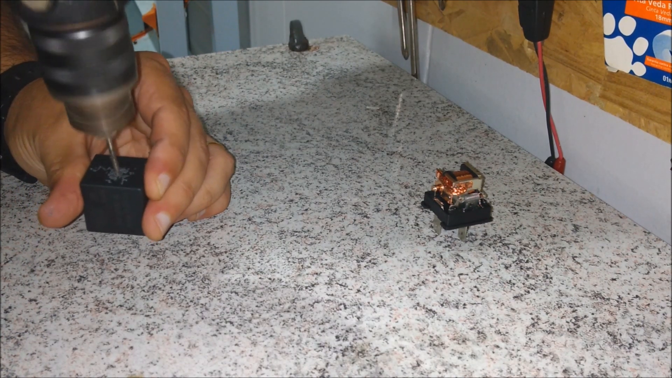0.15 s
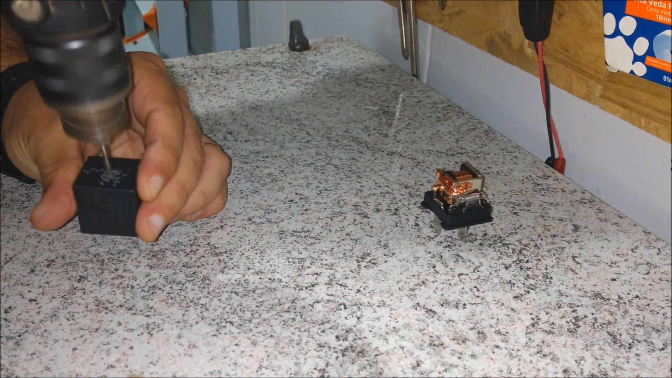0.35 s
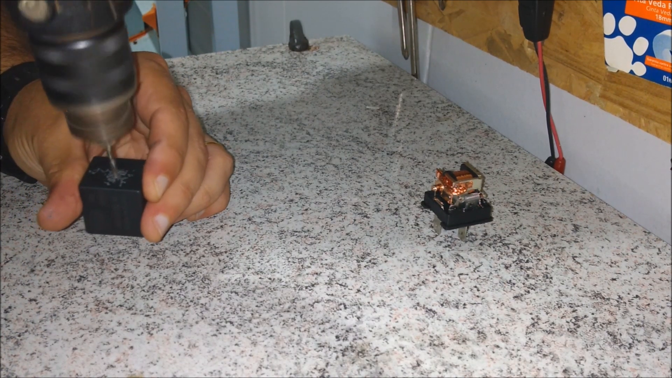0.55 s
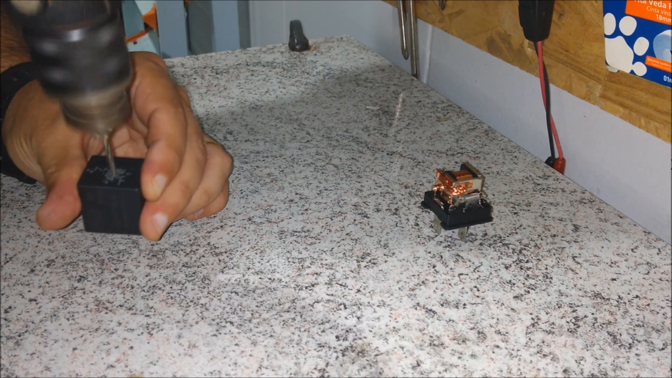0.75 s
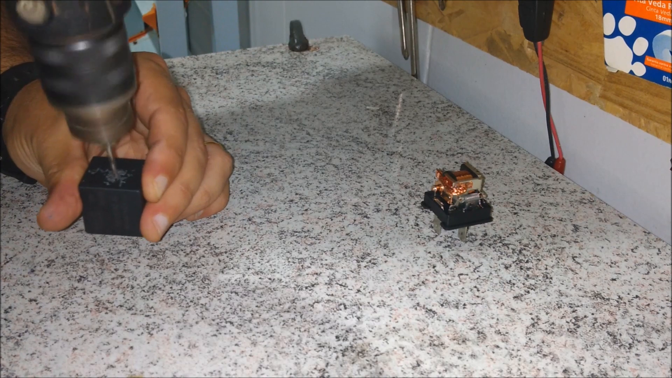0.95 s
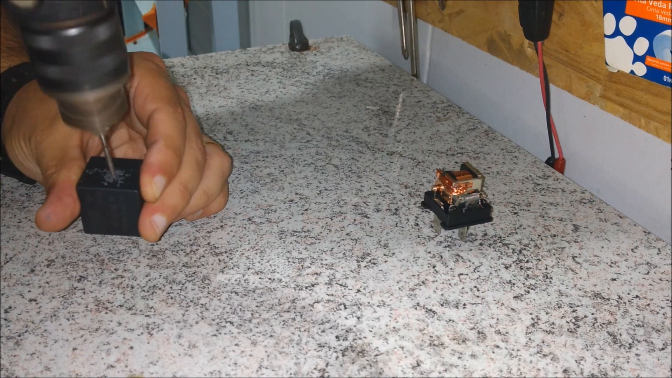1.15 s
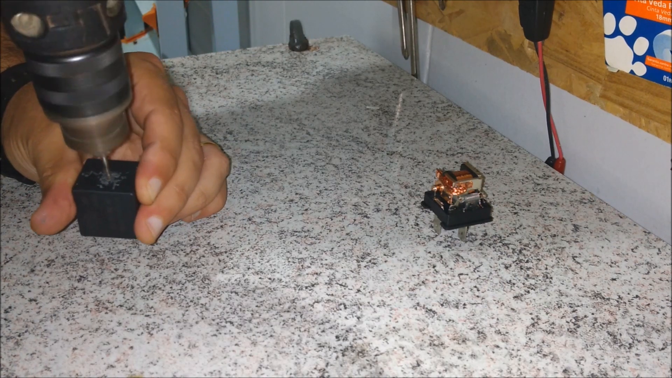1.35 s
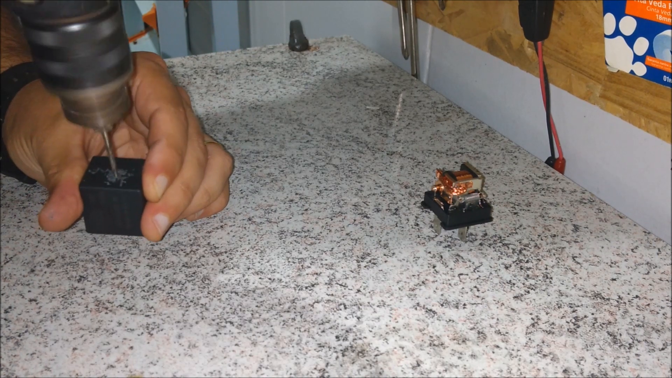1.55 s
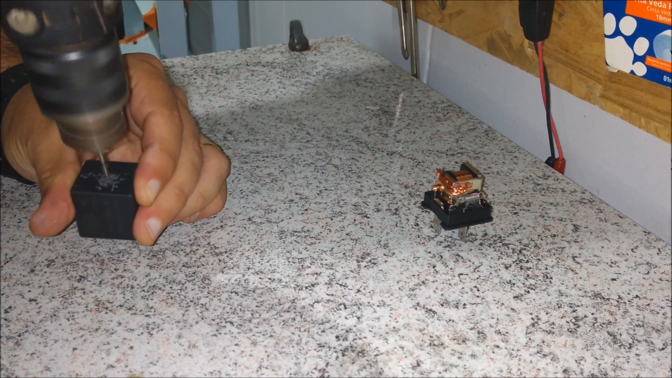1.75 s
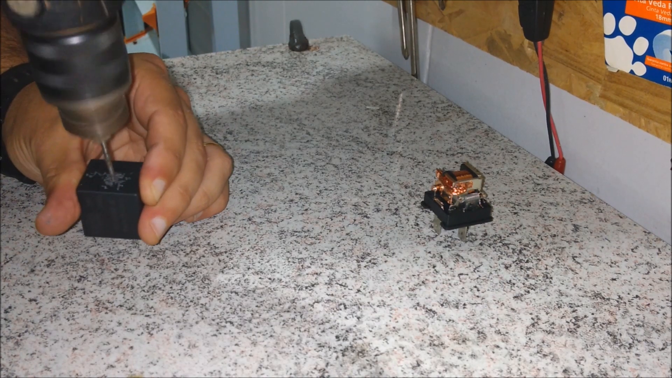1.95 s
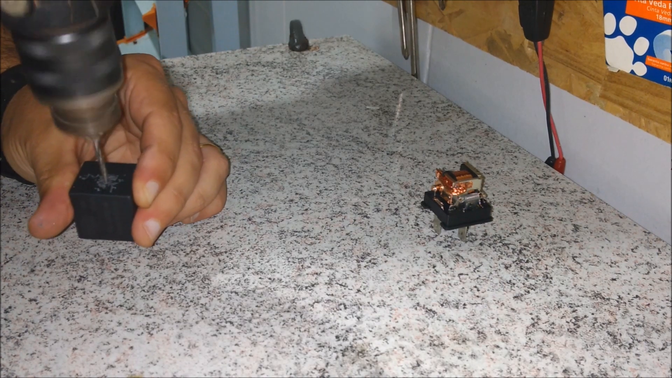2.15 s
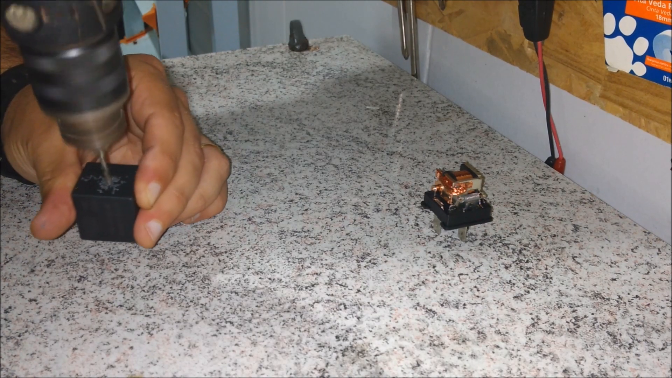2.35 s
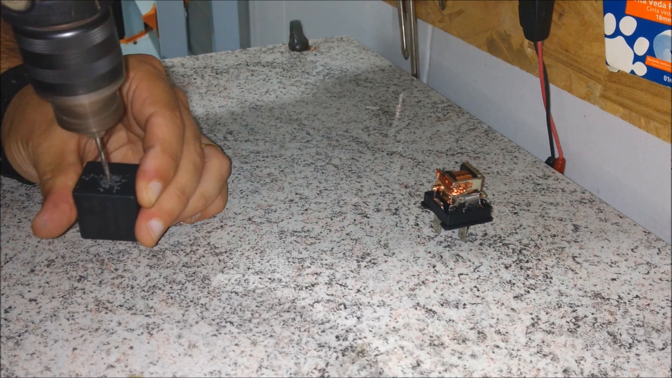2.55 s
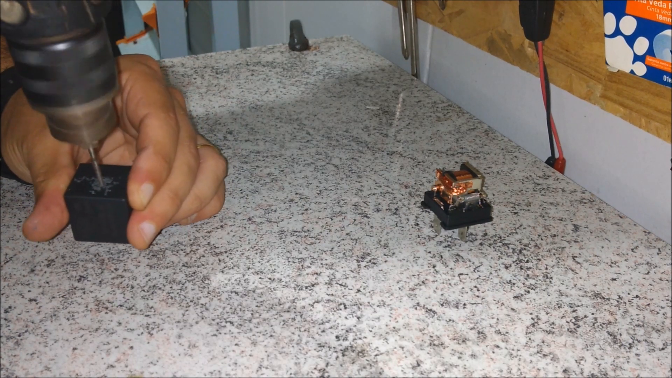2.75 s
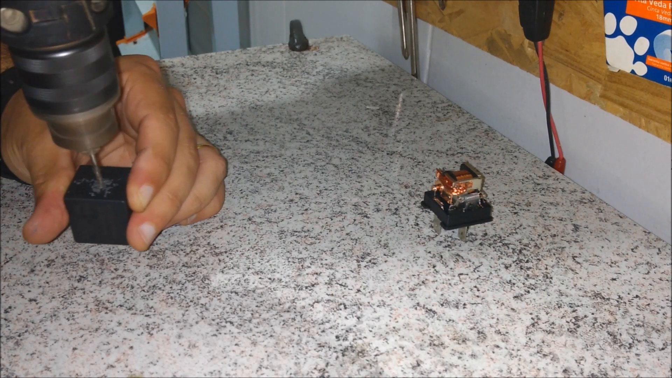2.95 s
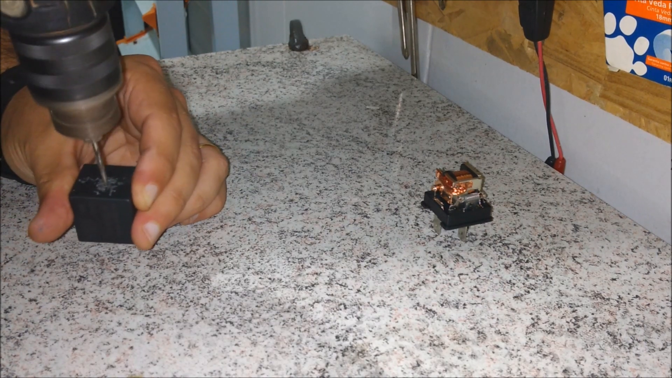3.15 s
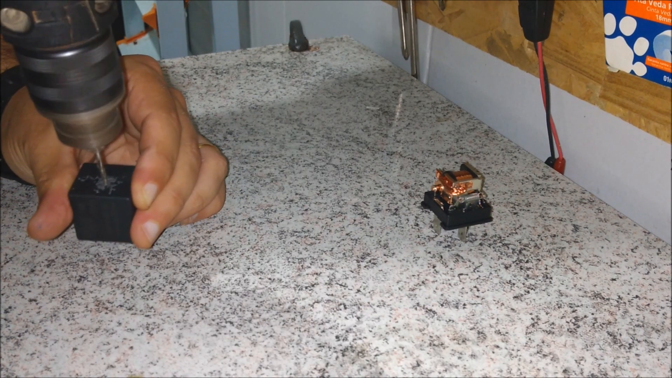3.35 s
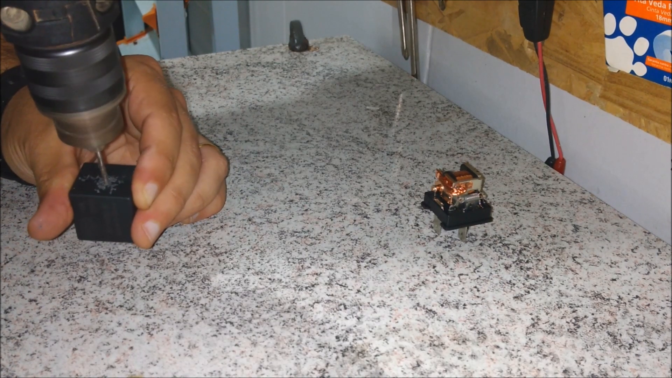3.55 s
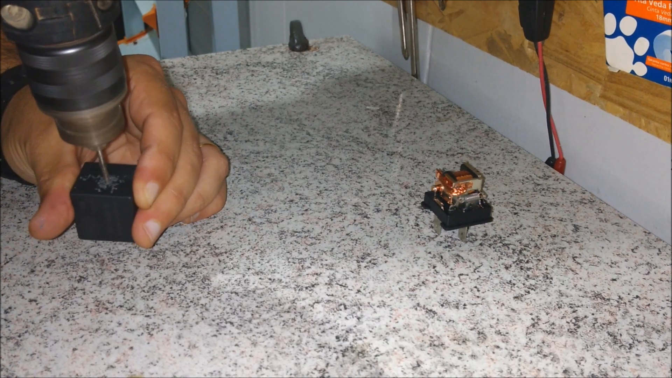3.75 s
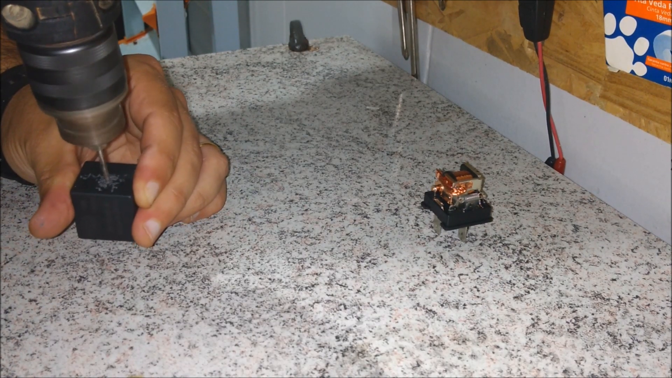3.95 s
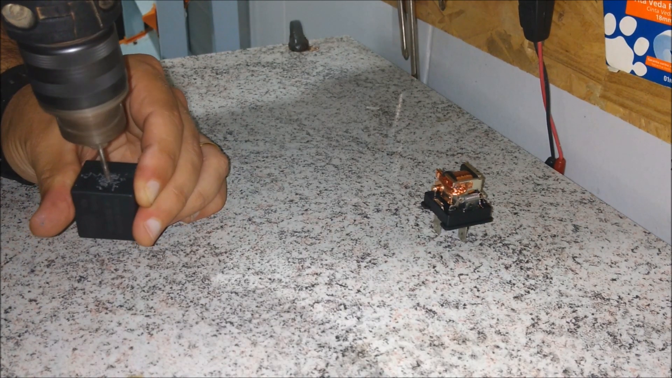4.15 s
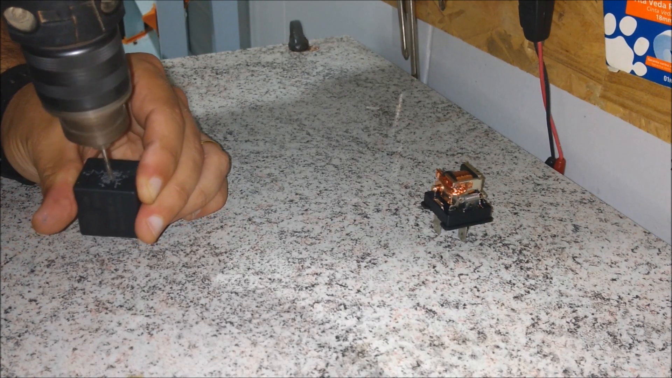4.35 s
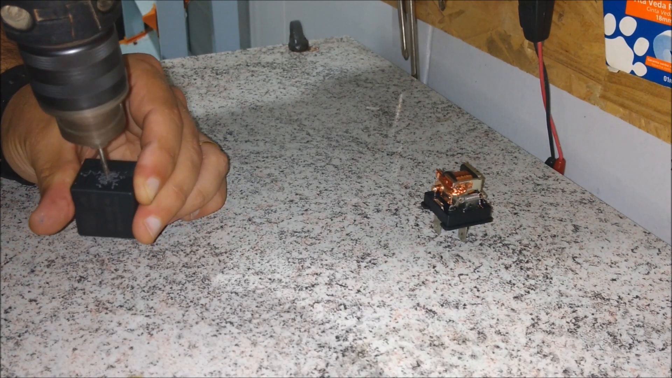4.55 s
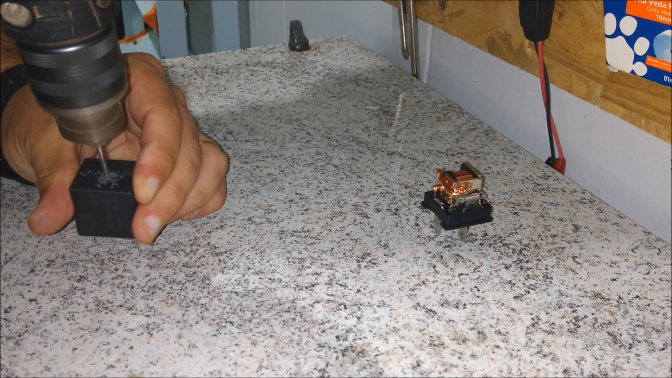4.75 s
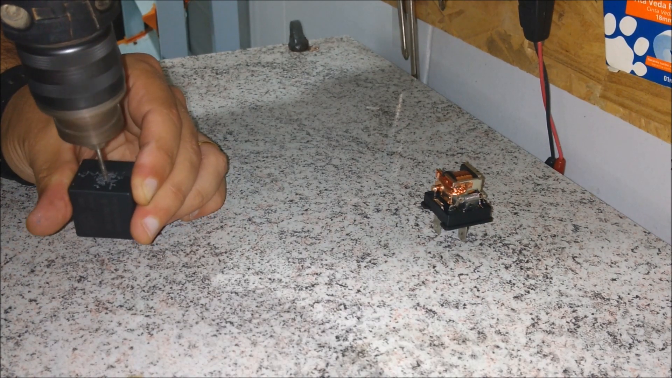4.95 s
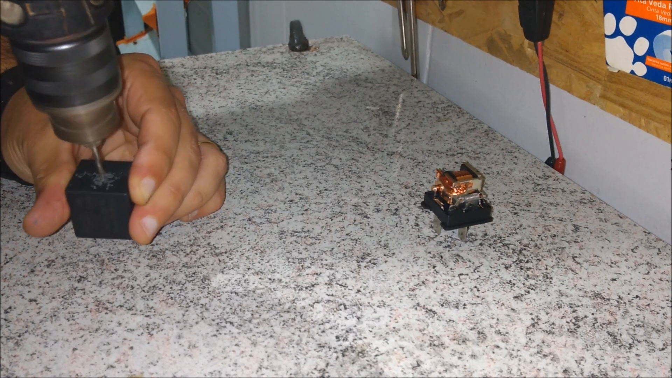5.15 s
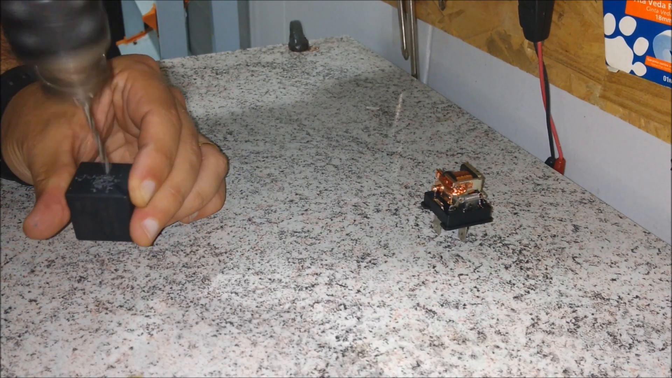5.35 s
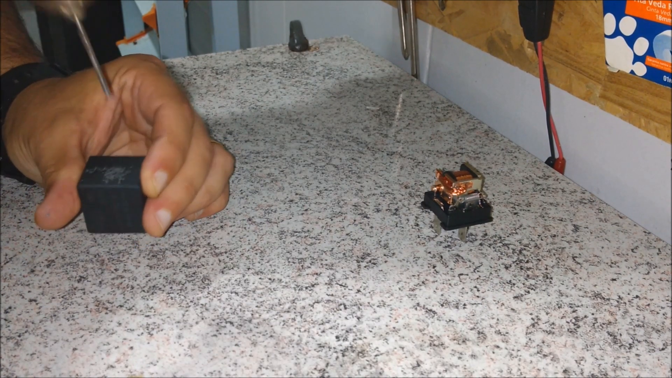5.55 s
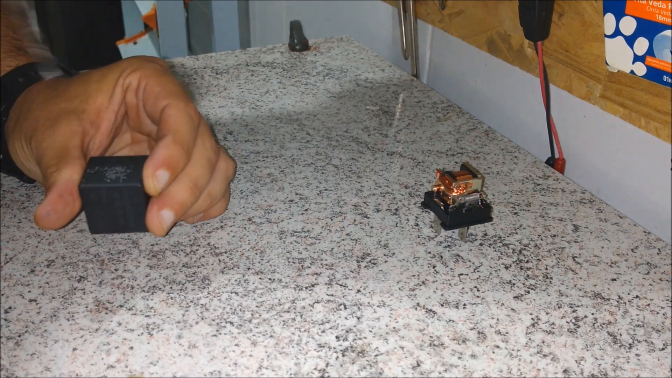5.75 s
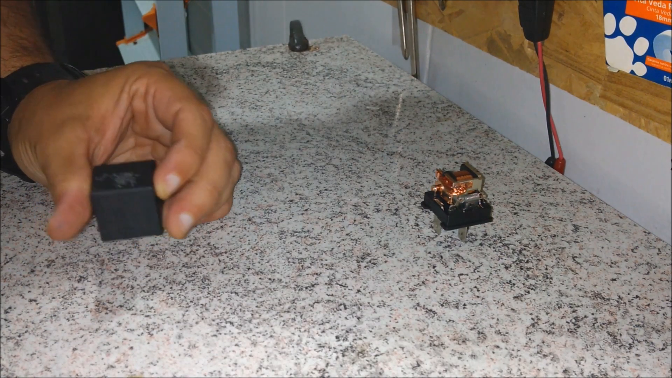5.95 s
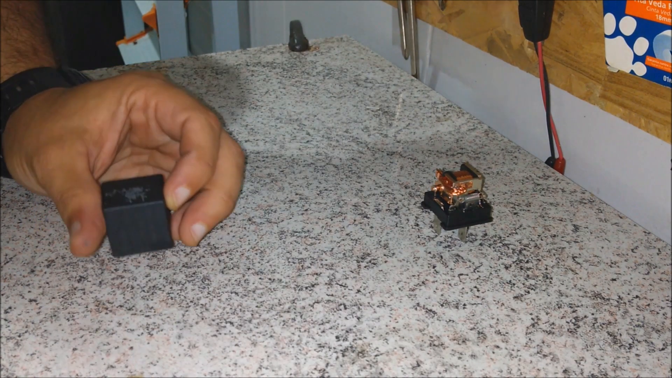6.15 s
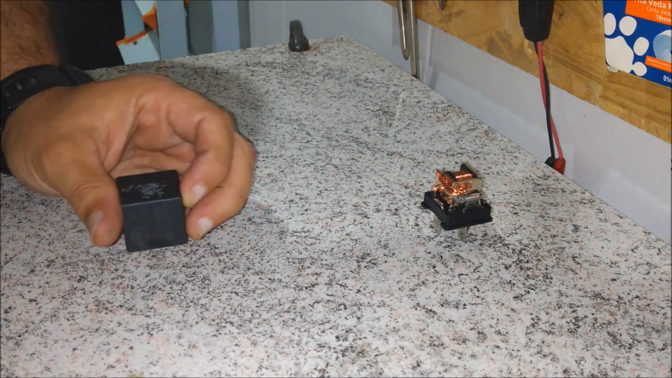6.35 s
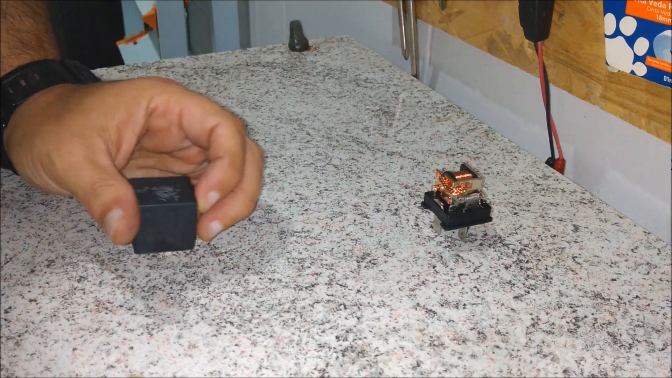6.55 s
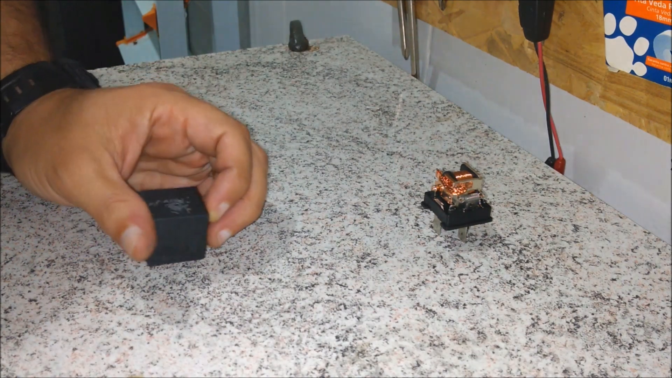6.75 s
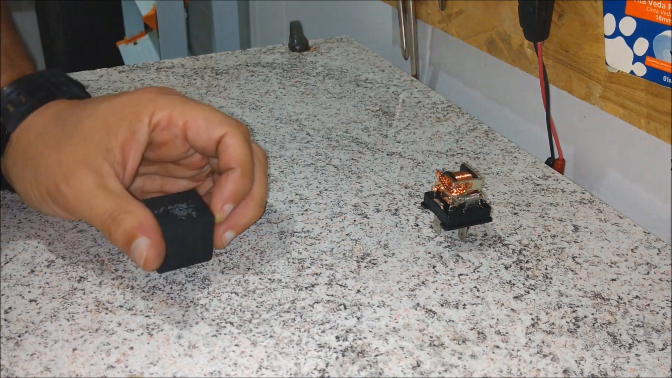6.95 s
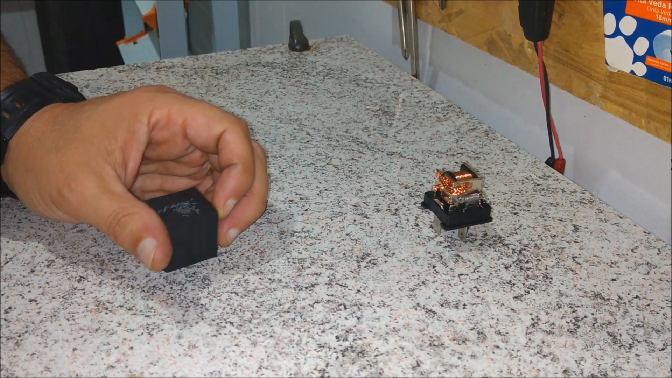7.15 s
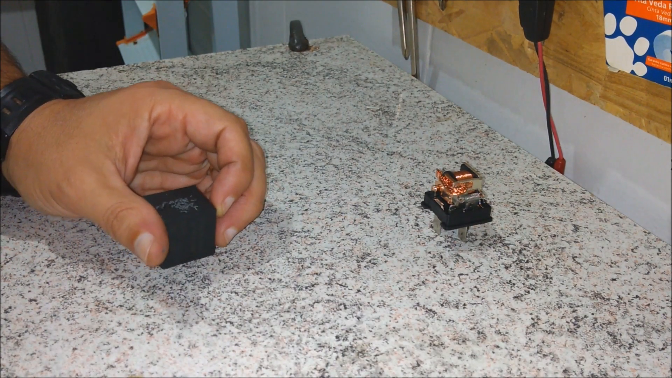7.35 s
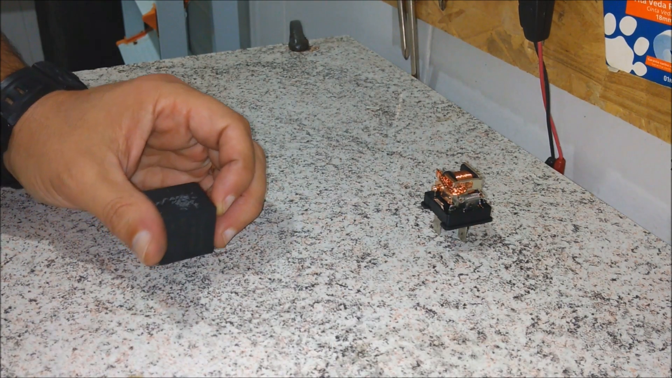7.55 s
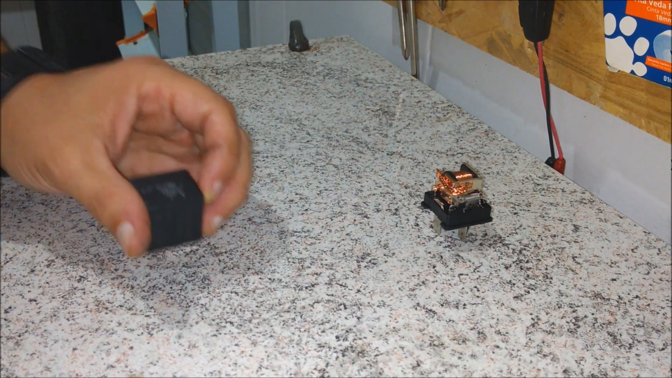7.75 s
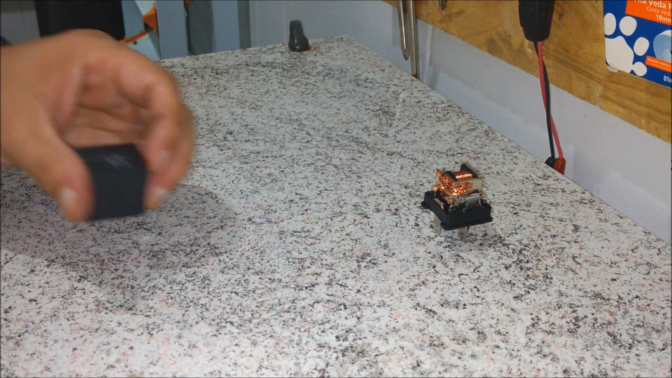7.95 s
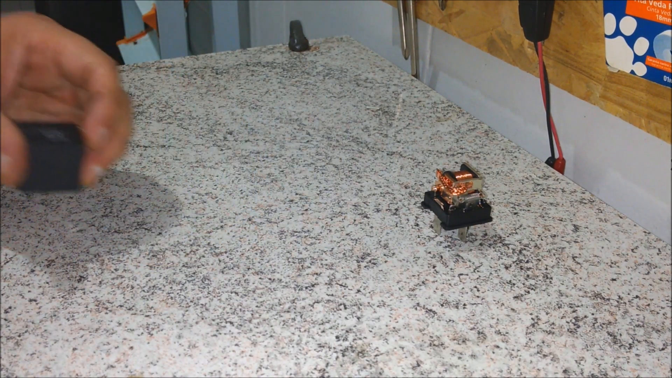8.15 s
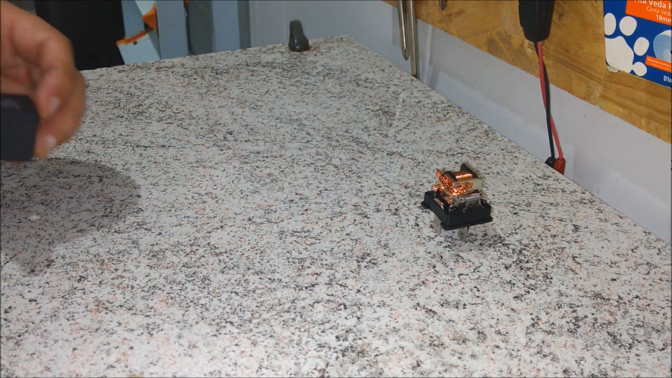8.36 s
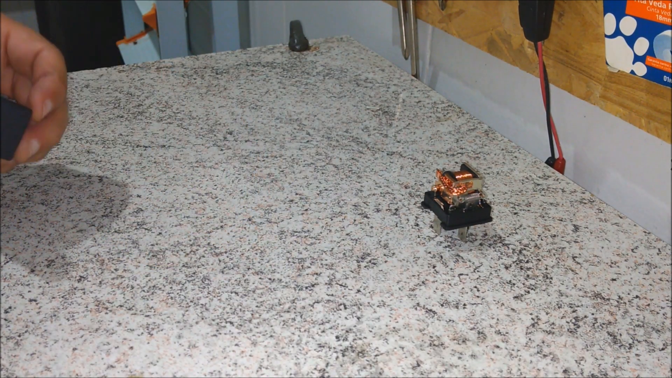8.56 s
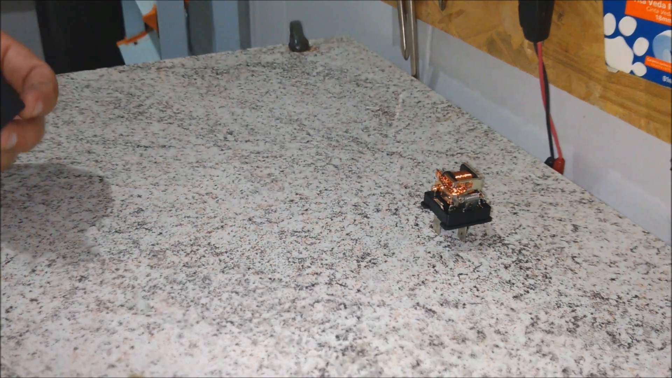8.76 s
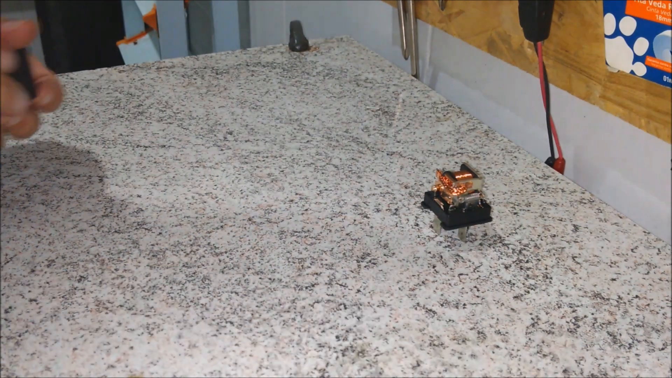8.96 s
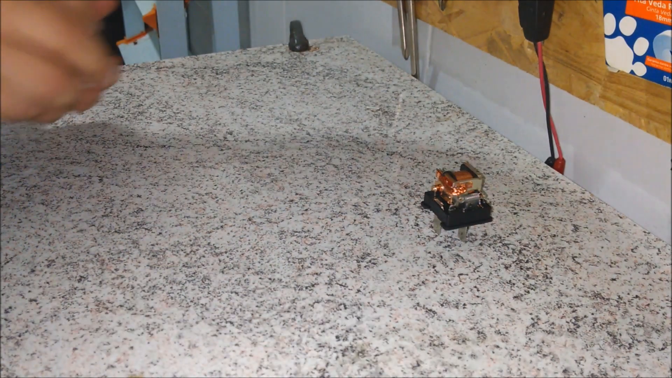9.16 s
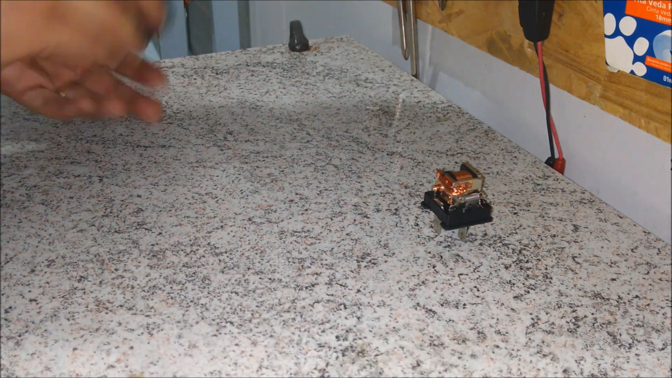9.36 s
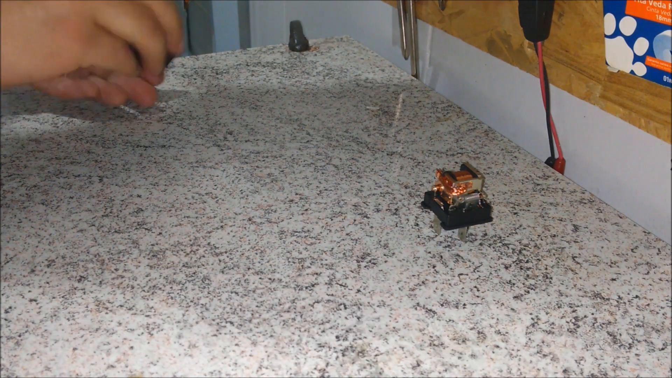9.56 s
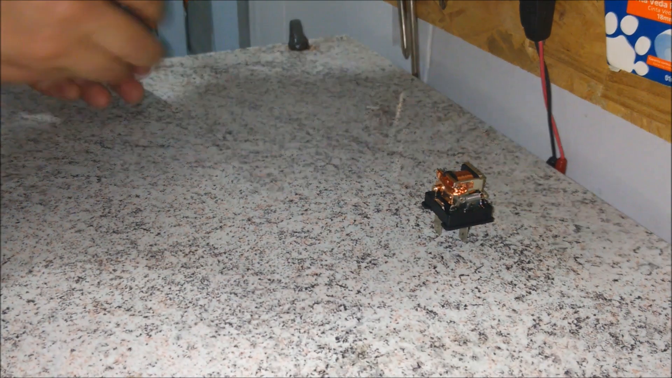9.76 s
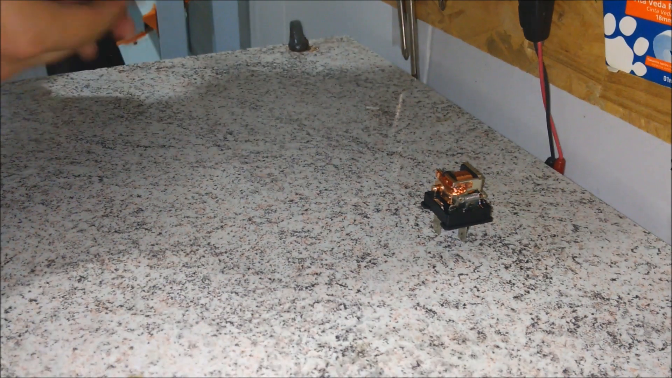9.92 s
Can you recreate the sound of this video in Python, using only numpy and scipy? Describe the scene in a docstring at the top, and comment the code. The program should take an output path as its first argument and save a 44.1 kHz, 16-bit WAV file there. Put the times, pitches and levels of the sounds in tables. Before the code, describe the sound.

From the start, an electric hand drill runs at a steady slow speed, boring into a small plastic cover. Its gears churn and rattle with a rough buzz and a thin whine, and sharp knocks come irregularly, several a second, as the bit catches and breaks free. At about 5.5 seconds the power drops and the motor coasts down with a quieter falling whine. The chuck clicks faintly to rest between 6.3 and 6.7 seconds.

The rest is much quieter. A soft bump comes at 6.9 and a quick clatter of taps at 7.2. From 7.5 to 8.9, things slide briefly over the stone bench among light taps and dull, booming bumps, the strongest at 8. Softer bumps follow near 9 and 9.3, and a small tool taps the stone at 9.8. Everything is close and in wide stereo, over the faint air of a small workshop.

```python
"""A mains hand drill, run slowly on its trigger, bores into a small plastic cover on a stone bench.
Each mains pulse jolts the slack gears, teeth clash and whine, and the bit catches and knocks free.
The motor coasts down with a falling whine, the chuck clicks to rest and the drill is put away.
The cover is tapped and slid about, and soft bumps set the bench booming and swaying.
It all sits in the still air of a small workshop, heard through a widened stereo microphone."""
import sys
import numpy as np
from scipy import signal
from scipy.fft import rfft, irfft, next_fast_len
from scipy.io import wavfile
from scipy.ndimage import uniform_filter1d

SR = 44100
rng = np.random.default_rng(int(sys.argv[2]) if len(sys.argv) > 2 else 0)


def generate_wav(signal):
    """Clip the signal to [-1, 1] and save it as 16-bit WAV at the path in sys.argv[1]."""
    frames = np.transpose(np.atleast_2d(signal))
    scaled = np.clip(frames, -1, 1) * 32767
    pcm = np.round(scaled).astype(np.int16)
    wavfile.write(sys.argv[1], SR, pcm)


N = 440559
TIME = np.arange(N) / SR

# squeeze on the trigger: time_s, power_share (0-1)
TRIGGER = [(0, 0.49), (5.36, 0.9), (5.52, 0.6), (5.56, 0.22)]
# how hard the bit is pressed in, as the level of the gears: time_s, level_db
BIT_LOAD = [(0.02, -32), (0.44, -32.5), (0.54, -35), (0.65, -32.5), (0.85, -33), (1.2, -32.5), (1.3, -36),
            (1.45, -32.5), (1.55, -34), (1.77, -32.5), (1.83, -38), (1.88, -33), (2.2, -33.5),
            (2.35, -34.5), (2.55, -34), (2.68, -31.5), (2.83, -33), (2.89, -35.5), (3.0, -34.5),
            (3.09, -36.5), (3.2, -32.5), (3.3, -34.5), (3.46, -32.5), (3.62, -37.5), (3.78, -33.5),
            (3.83, -36), (4.18, -36), (4.55, -34), (4.6, -36), (4.68, -35), (4.8, -36), (4.89, -33.5),
            (4.99, -35), (5.26, -33), (5.31, -37.5), (5.35, -33), (5.4, -39.5), (5.5, -34.5), (5.56, -45.5)]
# idle gears rattle until they are too slow to bounce, then only roll: mesh_hz, level_db
COAST_LEVEL = [(35, -78.5), (190, -51), (310, -49), (385, -41), (900, -39.5)]
# hardest knocks of gears and bit: start_s, peak_db, bright_over_dull_db
HARD_KNOCKS = [(0.034, -15, -4.5), (0.126, -19, 11), (0.221, -26, 1), (0.351, -18, 6), (0.427, -16.5, 5),
               (0.604, -16, 5), (0.62, -21.5, -6), (0.836, -16, 0), (0.853, -16, -5), (0.903, -17.5, 5),
               (0.936, -21, 11), (0.999, -17.5, -10), (1.032, -20.5, -16), (1.052, -20, 8), (1.249, -20, 5),
               (1.356, -19.5, 1), (1.454, -15, 0), (1.49, -16.5, -1), (1.587, -16.5, 2), (1.62, -20, 5),
               (1.687, -16, 11), (1.728, -16, 4), (1.742, -18, 14), (1.752, -23, 11), (1.771, -13.5, 4),
               (1.856, -14.5, 15), (2.022, -18.5, 4), (2.104, -17, 2), (2.122, -17.5, -6),
               (2.451, -18, -20), (2.467, -21, -1), (2.485, -19.5, 1), (2.573, -16.5, 12), (2.584, -23, 5),
               (2.721, -17, 3), (2.821, -16.5, 7), (2.85, -13, -1), (2.935, -19, 4), (3.187, -17.5, 1),
               (3.338, -18, 7), (3.422, -14.5, 3), (3.441, -23, 17), (3.471, -18.5, 15), (3.559, -18.5, 7),
               (3.855, -15, 14), (3.863, -18, 11), (3.872, -16, 8), (3.964, -18.5, 15), (3.974, -16.5, 11),
               (4.088, -16.5, 5), (4.436, -16.5, -2), (4.506, -18, 16), (4.641, -19, 15),
               (4.709, -15.5, 23), (4.843, -17.5, -1), (5.003, -21, 5), (5.205, -19.5, 10),
               (5.225, -18.5, 12), (5.343, -18, 5)]
# dull churn, the body of the gear sound: frequency_hz, level_db
CHURN_COLOUR = [(40, -56), (80, -15.5), (130, -9), (200, -6.5), (350, 0.5), (480, -1.5), (600, -4),
                (780, -0.5), (1250, -1.5), (1750, -9), (2300, -5.5), (4000, -9.5), (9000, -35.5)]
# bright rattle, its edge: frequency_hz, level_db
RATTLE_COLOUR = [(40, -49), (150, -30.5), (500, -11), (1200, -7.5), (2200, -6.5), (3100, -2), (3900, 2),
                 (4700, -5), (5600, -6), (6300, -1), (6900, -8), (8800, -3.5), (9900, -10.5),
                 (13000, -15.5), (15500, -19.5)]
# gearbox and housing resonances: pitch_hz, width_hz, level_db, left_over_right_db
HOUSING_MODES = [(483, 25, -2, -16.5), (1080, 68, -9, -11), (1413, 74, -8.5, 27), (1720, 207, -2.5, 24.5),
                 (2840, 500, -9.5, 10.5), (7570, 720, -3, 5.5), (8780, 140, -12.5, 2)]
# the housing rocks sideways, pushing one capsule and pulling the other: pitch_hz, width_hz, level_db
ROCKING_MODES = [(606, 53, 12), (1770, 540, -0.5)]
# how well the casing radiates a gear tone: pitch_hz, level_db
WHINE_COLOUR = [(500, -14), (950, -16), (1210, -9), (1450, -26), (1750, -16), (2000, 1), (2200, -21),
                (2430, -8), (2560, 1), (2750, -4.5), (3150, -11), (3600, -17)]
# modes of the drill running free: pitch_hz, level_db, t60_s
FREE_MODES = [(491, -3, 0.061), (1086, -6, 0.051), (1250, -12.5, 0.0095), (2655, -6.5, 0.011),
              (8920, -20, 0.0065)]
# the chuck coming to rest: start_s, click_db, ring_db
CHUCK_CLICKS = [(6.335, -34.5, -59), (6.375, -40, -59), (6.489, -34, -44), (6.496, -35, -40),
                (6.528, -40.5, -42), (6.593, -51, -43), (6.63, -42, -49), (6.73, -42.5, -48.5)]
# ring of the chuck: pitch_hz, level_db, t60_s
CHUCK_MODES = [(629, 0, 0.055), (760, -10, 0.045), (1160, -3, 0.04)]
# hard contacts of tool and cover: start_s, level_db, tilt_db_per_octave, t60_s, pitch_hz
TAPS = [(6.887, -41.5, -6.5, 0.11, 450), (7.152, -30.5, 0.5, 0.06, 1000), (7.164, -35.5, -1, 0.043, 806),
        (7.18, -35, -1.5, 0.05, 1050), (7.674, -50, -1, 0.056, 620), (7.768, -46, -3.5, 0.038, 1370),
        (7.845, -40, -2, 0.044, 600), (8.012, -42, -8, 0.044, 640), (9.84, -43, -4, 0.032, 400)]
# tone of a hard contact: frequency_hz, level_db
TAP_COLOUR = [(60, -18), (200, 5), (400, -2), (620, 4.5), (900, 0.5), (1300, 3), (1900, 5), (3300, -0.5),
              (4300, -5.5), (8000, -5.5), (15000, -18)]
# a small hard tool touches the stone: start_s, level_db
TOOL_TOUCH = [(9.839, -36)]
# ring of that tool: pitch_hz, level_db, t60_s
TOOL_MODES = [(468, 0.5, 0.017), (600, -1, 0.021), (1880, 7, 0.024), (2610, -3.5, 0.02), (3360, -10, 0.033)]
# things sliding over the stone: middle_s, half_length_s, level_db, tilt_db_per_octave
SLIDES = [(7.51, 0.033, -46.5, -1), (7.698, 0.022, -47.5, -0.5), (7.817, 0.067, -54, 0.5),
          (8.01, 0.1, -53.5, 1.5), (8.135, 0.049, -48, -0.5), (8.23, 0.054, -50, 0), (8.598, 0.24, -66, 2),
          (8.796, 0.04, -52.5, 5), (8.825, 0.05, -49, -6)]
# tone of the friction: frequency_hz, level_db
SLIDE_COLOUR = [(60, -7), (200, 2.5), (700, 1.5), (1400, -1.5), (2200, -3), (2900, -7.5), (3600, -9),
                (4500, -15), (8000, -17.5), (15000, -26.5)]
# squeaks of the cover's edge: middle_s, level_db
SQUEAKS = [(6.92, -55), (8.79, -55.5)]
# soft bumps on the bench: start_s, level_db, favoured_pitch_hz
BUMPS = [(6.886, -46, 264.7), (6.898, -40, 151), (7.161, -38.5, 220), (7.722, -29.5, 149),
         (7.769, -38, 100), (7.998, -24, 191.2), (8.024, -26.5, 211), (8.477, -35, 197), (8.5, -41, 200),
         (8.964, -37, 172), (9.291, -40, 136.5)]
# boom of the bench: pitch_hz, level_db, t60_s
BENCH_MODES = [(113.2, -4.5, 0.61), (182, -0.5, 0.24), (216.4, -3, 0.27), (324, 5.5, 0.095),
               (390, -1, 0.26), (457, -13, 0.14)]
# rumble of an arm dragging over the bench: time_s, level_db
ARM_DRAG = [(7.6, -81), (7.85, -48), (8.35, -53), (8.7, -54), (8.9, -60.5), (9.4, -63), (9.5, -93)]
# blows that set the whole bench swaying: start_s, level_db
SWAY_BLOWS = [(6.886, -45), (8.476, -55), (8.964, -55)]
# still air of the workshop: frequency_hz, level_db
AIR_COLOUR = [(25, -20), (50, -5), (80, -5), (120, -2), (220, 3), (400, -7.5), (1000, -20), (2000, -24.5),
              (4000, -25.5), (8000, -30), (15000, -31)]
# decay of the workshop's echoes: frequency_hz, t60_s
ROOM_DECAY = [(150, 0.4), (1000, 0.21), (3000, 0.22), (8000, 0.23), (15000, 0.2)]

MAINS_HZ, MESH_HZ = 59.955, 1225   # mains kicks; teeth meeting at drilling speed
RELAXED_HZ = 960   # below this mesh rate the teeth carry no strain and the upper whines ring out
CHURN_DB, RATTLE_DB, WHIRR_DB = -7.5, -7, -6   # relative to the gear level
WHINE_DB = -42.5   # at drilling speed; fades as the motor slows
IDLE_BRIGHT_DB, DULLING_DB = 2, 4   # idle gears rattle more brightly, but dull as they stop


def drill():
    """Churn and rattle shake the housing; the mesh whines through it and the free gears whirr."""
    mesh_hz, power, gear_db = motor()
    dull, bright = gear_shake(mesh_hz, power, gear_db)
    churn = struck(dull, air_pair(alike_below_hz=510, likeness=0.93), crack_db=7, left_db=-2)
    rattle = struck(bright, air_pair(), crack_db=11.5, left_db=-3)
    clatter = housing(coloured(churn, CHURN_COLOUR) + coloured(rattle, RATTLE_COLOUR))
    tones = whine(mesh_hz) * from_db(WHINE_DB) * mesh_hz / MESH_HZ
    coasting = (1 - power) * from_db(gear_db + WHIRR_DB) * whirr()
    return in_room(panned(clatter + tones + coasting, left_db=-2.5), wet_db=-5)


def motor(eased_s=5.35, slowing_hz_per_s=915, surge_db=0.74):
    """Mesh rate, power and gear level: speed holds until the trigger eases, then friction slows it."""
    mesh_hz = np.clip(MESH_HZ - slowing_hz_per_s * (TIME - eased_s), 1, MESH_HZ)
    power = in_time(TRIGGER)
    driven_db = in_time(BIT_LOAD) + surge_db * drift(11)   # the bit grabs and slips
    idle_db = at_hz(COAST_LEVEL, mesh_hz)
    engaged = np.minimum(2 * power, 1)
    return mesh_hz, power, engaged * driven_db + (1 - engaged) * idle_db


def gear_shake(mesh_hz, power, gear_db, flutter_db=0.2):
    """Dull and bright envelopes of the gears, built from mains jolts, tooth clashes and knocks."""
    rattle_db = gear_db + RATTLE_DB + power * flutter_db * drift(17) + (1 - power) * IDLE_BRIGHT_DB
    rattle_db -= DULLING_DB * (1 - mesh_hz / MESH_HZ) ** 2
    # the kick lands dull, and the gears spring back bright
    kick = jolts(late_s=-0.00054, jitter_s=0.0004, spread_db=3, t60=0.019)
    rebound = jolts(late_s=0.003, jitter_s=0.00082, spread_db=4.5, t60=0.035)
    # loaded teeth clash unevenly; coasting ones run smooth
    clashes = chatter(mesh_hz, share=0.3, spread_db=3 + power, t60=0.017)
    teeth = np.hypot((0.54 + 0.44 * power) * clashes, 0.72 * (1 - power))
    churn_energy = (0.62 * teeth) ** 2 + power * ((0.67 * kick) ** 2 + (0.46 * rebound) ** 2)
    rattle_energy = (0.58 * teeth) ** 2 + power * ((0.21 * kick) ** 2 + (0.74 * rebound) ** 2)
    churn = np.sqrt(churn_energy / (0.5 + 0.5 * power)) * from_db(gear_db + CHURN_DB)
    rattle = np.sqrt(rattle_energy / (0.42 + 0.82 * power)) * from_db(rattle_db)
    duck = bit_catch()
    dull_knocks, bright_knocks = knocks(mesh_hz, power, gear_db)
    return np.hypot(churn * duck, dull_knocks), np.hypot(rattle * duck, bright_knocks)


def jolts(late_s, jitter_s, spread_db, t60):
    """The speed control fires once a mains cycle; each kick throws the gears across their slack."""
    fired_s = np.arange(0, N / SR, 1 / MAINS_HZ)
    timing, force = rng.standard_normal((len(fired_s), 2)).T
    kicks = clicks(fired_s + late_s + jitter_s * timing, from_db(spread_db * np.minimum(force, 1.5)))
    return rms_one(dying(kicks, t60))


def chatter(mesh_hz, share, spread_db, t60):
    """Now and then a passing tooth clashes, each with a force of its own."""
    clashes = rng.random(N) < share * (mesh_hz + 400) / SR
    force = from_db(spread_db * np.minimum(rng.standard_normal(N), 2))
    shake = dying(clashes * force, t60)
    return shake / np.sqrt(uniform_filter1d(shake ** 2, size=6000) + 1e-9)


def bit_catch(dip_db=1.29):
    """The bit catches and ducks the gears just before it breaks free with a hard knock."""
    knock_s = np.transpose(HARD_KNOCKS)[0]
    caught = dying(clicks(knock_s, 1)[::-1], t60=0.041)[::-1]
    return from_db(-dip_db * caught)


def knocks(mesh_hz, power, gear_db, lesser_share=0.12, teeth_per_turn=20, small_bright_db=4.5):
    """Dull and bright envelopes of hard knocks, lesser ones on chance mains kicks, and gear ticks."""
    fired_s = np.arange(0, N / SR, 1 / MAINS_HZ)
    landed = rng.random(len(fired_s)) < lesser_share
    lesser = power * clicks(fired_s + 0.0024, from_db(-0.5) * landed)
    # slack gears tick once a turn, louder as the power drops
    turns = np.cumsum(mesh_hz * from_db(1.5 * drift(50))) / SR / teeth_per_turn
    ticks = (1 - power) * from_db(1.5) * np.diff(np.floor(turns), prepend=0)
    small = from_db(gear_db + 5.5 * np.minimum(rng.standard_normal(N), 1)) * (lesser + ticks)
    start_s, peak_db, bright_db = np.transpose(HARD_KNOCKS)
    burst = from_db(peak_db - 9.5)   # the noise burst sits under the knock's peak
    envelopes = []
    for sign in (1, -1):   # split the energy: dull share, then bright share
        hard = clicks(start_s + 0.0006, burst / np.hypot(1, from_db(sign * bright_db)))
        envelopes.append(dying(hard + small / np.hypot(1, from_db(sign * small_bright_db)), t60=0.022))
    return envelopes


def struck(shake, noise, crack_db, left_db):
    """Metal meets metal: each jump in the shaking starts with one clean crack, and noise follows."""
    crack = np.sqrt(np.maximum(shake ** 2 - 1.1 * np.roll(shake, 1) ** 2, 0))
    return noise * shake + from_db(crack_db) * panned(crack, left_db)


def housing(x):
    """The gearbox lifts narrow bands of whatever shakes it, each radiated its own way."""
    body = sum(from_db(db) * panned(resonance(x, hz, width), left_db)
               for hz, width, db, left_db in HOUSING_MODES)
    side = (x[0] - x[1]) / 2
    rocking = sum(from_db(db) * resonance(side, hz, width) for hz, width, db in ROCKING_MODES)
    return x + body + rocking * [[1], [-1]]


def whine(mesh_hz, harmonics=6, strain_loss_db=19, upper_loss_db=1.5):
    """Mesh harmonics light up in turn as they fall through the casing's range; load smears them."""
    strain = np.clip((mesh_hz - RELAXED_HZ) / (MESH_HZ - RELAXED_HZ), 0, 1) ** 0.5
    wobble = 1 + 0.008 * strain * drift(9) + 0.0065 * drift(160)
    phase = 2 * np.pi * np.cumsum(mesh_hz * wobble) / SR
    tones = 0
    for k in range(1, harmonics + 1):
        loss_db = strain_loss_db * strain * (k > 1) + upper_loss_db * max(k - 3, 0)
        tones += from_db(at_hz(WHINE_COLOUR, k * mesh_hz) - loss_db) * np.sin(k * phase)
    return tones * from_db(3.5 * drift(60))   # the level flickers


def whirr():
    """Coasting gears stroke the free housing evenly, and its modes sing."""
    return sum(from_db(db) * rms_one(ring(air_pair(), hz, t60)) for hz, db, t60 in FREE_MODES)


def chuck():
    """The stopping chuck rocks in its slack: each stop is a dry click that leaves it ringing."""
    out = np.zeros((2, N))
    for start_s, click_db, _ in CHUCK_CLICKS:
        burst = noise_burst(size=4000, t60=0.016)
        add(out, start_s, from_db(click_db) * coloured(burst, TAP_COLOUR, tilt_db=-0.5))
    start_s, _, ring_db = np.transpose(CHUCK_CLICKS)
    return in_room(out + ring_modes(CHUCK_MODES, start_s, ring_db), wet_db=-2)


def taps(ring_db=6, ring_width_hz=140):
    """Each contact is a short clatter, brighter the harder the surfaces; the tool rings briefly."""
    out = np.zeros((2, N))
    for start_s, db, tilt_db, t60, ring_hz in TAPS:
        burst = noise_burst(size=12000, t60=t60)
        burst += from_db(ring_db) * resonance(burst, ring_hz, ring_width_hz)
        add(out, start_s, from_db(db) * coloured(burst, TAP_COLOUR, tilt_db))
    touch_s, touch_db = np.transpose(TOOL_TOUCH)
    return in_room(out + ring_modes(TOOL_MODES, touch_s, touch_db), wet_db=-1)


def slides(size=32000, trim_db=-5.5, grain_db=2.3):
    """Friction swells and fades, made grainy by the stone."""
    out = np.zeros((2, N))
    t = TIME[:size] - size / SR / 2
    for middle_s, half_s, db, tilt_db in SLIDES:
        stroke = air_pair(size) * np.exp(-(t / half_s) ** 2)
        add(out, middle_s + t[0], from_db(db + trim_db) * coloured(stroke, SLIDE_COLOUR, tilt_db))
    return in_room(panned(out * from_db(grain_db * drift(250)), left_db=-2), wet_db=-4)


def squeaks(half_s=0.036):
    """The cover's edge catches on the stone: short rasps in one narrow band."""
    rasp = rms_one(ring(air_pair(), hz=3120, t60=0.003)) * from_db(3.1 * drift(220))
    return rasp * sum(from_db(db) * np.exp(-((TIME - s) / half_s) ** 2) for s, db in SQUEAKS)


def bumps(reach_octaves=0.63, low_hz=88, high_hz=420):
    """Soft blows ring the bench modes near their own pitch; a dragging arm stirs the lowest."""
    start_s, db, blow_hz = np.transpose(BUMPS)
    boom = 0
    for hz, mode_db, t60 in BENCH_MODES:
        favour = np.exp(-(np.log2(hz / blow_hz) / reach_octaves) ** 2)
        boom += ring(clicks(start_s, from_db(db + mode_db) * favour), hz, t60)
    rumble = rms_one(ring(rng.standard_normal(N), BENCH_MODES[0][0], t60=0.15))
    thuds = low_cut(boom + rumble * from_db(in_time(ARM_DRAG)), low_hz)
    soft = signal.sosfilt(signal.butter(2, high_hz, fs=SR, output="sos"), thuds)
    return in_room(panned(soft, left_db=-2), wet_db=-13.5)


def bench_sway(right_lag_s=0.0047):
    """The whole bench sways with a long sub-bass note that reaches the right capsule late."""
    start_s, db = np.transpose(SWAY_BLOWS)
    sway = [ring(clicks(start_s + lag_s, from_db(db)), hz=49, t60=1.9) for lag_s in (0, right_lag_s)]
    return panned(np.array(sway), left_db=-1)


def room_tone(level_db=-62):
    """The workshop's still air, a faint dark bed of noise."""
    return from_db(level_db) * coloured(air_pair(), AIR_COLOUR)


def in_room(x, wet_db, first_echo_s=0.0026, size=16384):
    """Add the workshop's dense echoes, which linger longest in the bass."""
    t, white, tail = TIME[:size], air_pair(size), 0
    edges_hz = np.geomspace(60, 16000, 9)
    for low, high in zip(edges_hz, edges_hz[1:]):
        band = signal.sosfilt(signal.butter(2, [low, high], "band", fs=SR, output="sos"), white)
        tail += band * np.exp(-np.log(1000) * t / at_hz(ROOM_DECAY, np.sqrt(low * high)))
    tail = rms_one(tail * (t > first_echo_s)) / np.sqrt(size)
    return x + from_db(wet_db) * signal.oaconvolve(x, tail, axes=1)[:, :N]


def air_pair(size=N, alike_below_hz=520, likeness=0.22):
    """White noise at two close capsules: partly alike in the bass, unrelated in the treble."""
    padded = next_fast_len(size)
    alike = likeness / (1 + (np.fft.rfftfreq(padded, 1 / SR) / alike_below_hz) ** 2)
    mid, side = rfft(rng.standard_normal((2, padded)))
    return irfft(np.sqrt(1 + alike) * mid + np.sqrt(1 - alike) * side * [[1], [-1]], padded)[:, :size]


def noise_burst(size, t60):
    """Stereo noise with an instant attack and a dying tail."""
    return air_pair(size) * np.exp(-np.log(1000) * TIME[:size] / t60)


def coloured(x, colour, tilt_db=0, tilt_from_hz=170, size=4096):
    """Minimum-phase EQ of unit power with the given colour and tilt per octave."""
    hz = np.fft.rfftfreq(size, 1 / SR)
    curve_db = at_hz(colour, hz) + tilt_db * np.log2(np.maximum(hz, tilt_from_hz))
    cepstrum = irfft(np.log(from_db(curve_db)))
    kernel = irfft(np.exp(rfft(2 * cepstrum[:size // 2], size)))
    return signal.oaconvolve(x, kernel[None] / np.linalg.norm(kernel), axes=1)[:, :x.shape[1]]


def clicks(times, heights):
    """Single-sample blows at the given times."""
    out = np.zeros(N)
    np.add.at(out, np.clip(np.round(np.asarray(times) * SR).astype(int), 0, N - 1), heights)
    return out


def dying(blows, t60):
    """Envelope of blows whose energies add up and die away."""
    return np.sqrt(signal.lfilter([1], [1, -from_db(-120 / (t60 * SR))], blows ** 2 + 1e-18))


def ring(blows, hz, t60):
    """A unit blow sets a sine of height 1 ringing."""
    r, w = from_db(-60 / (t60 * SR)), 2 * np.pi * hz / SR
    return signal.lfilter([0, np.sin(w)], [1, -2 * r * np.cos(w), r * r], blows + 1e-18)


def ring_modes(modes, start_s, level_db):
    """Each blow rings all the modes of an object."""
    return sum(ring(clicks(start_s, from_db(level_db + db)), hz, t60) for hz, db, t60 in modes)


def resonance(x, hz, width_hz):
    """Two-pole resonance, gain 1 on top."""
    r = np.exp(-np.pi * width_hz / SR)
    poles = [1, -2 * r * np.cos(2 * np.pi * hz / SR), r * r]
    return signal.lfilter([1, 0, -1], poles, x) * (1 - r * r) / 2


def low_cut(x, hz):
    """Steep high-pass."""
    return signal.sosfilt(signal.butter(4, hz, "high", fs=SR, output="sos"), x)


def drift(rate):
    """Random wander of rms 1, with so many turns a second."""
    steps = rng.standard_normal(int(rate * N / SR) + 2)
    return rms_one(np.interp(TIME * rate, np.arange(len(steps)), steps))


def in_time(curve):
    """Read a curve at every sample."""
    return np.interp(TIME, *np.transpose(curve))


def at_hz(points, hz):
    """Read a table on a log-frequency axis."""
    known_hz, values = np.transpose(points)
    return np.interp(np.log(np.maximum(hz, 1)), np.log(known_hz), values)


def add(out, start_s, sound):
    """Mix a short stereo sound in at its time."""
    at = max(round(start_s * SR), 0)
    out[:, at:at + sound.shape[1]] += sound[:, :max(N - at, 0)]


def panned(x, left_db):
    """Lean a sound to one capsule."""
    return x * from_db([[left_db / 2], [-left_db / 2]])


def from_db(db):
    """Decibels to gain."""
    return 10 ** (np.asarray(db) / 20)


def rms_one(x):
    """Scale to rms 1."""
    return x / np.sqrt(np.mean(x ** 2) + 1e-20)


def scene():
    """The drill up front, then the handling on the bench, over the room tone."""
    bed = room_tone()
    return drill() + chuck() + taps() + slides() + squeaks() + bumps() + bench_sway() + bed


def record(dry, lag_s=0.0004878, cross=0.64, low_hz=260, high_hz=7400, rumble_hz=38, top_hz=15700):
    """The widener takes a late copy of each side from the other, hollowing the centre near 2 kHz."""
    size = next_fast_len(N + 2000)
    hz, sides = np.fft.rfftfreq(size, 1 / SR), rfft(dry, size)
    feed = cross * hz ** 2 / (hz ** 2 + low_hz ** 2) / (1 + (hz / high_hz) ** 2)
    wide = irfft(sides - feed * np.exp(-2j * np.pi * hz * lag_s) * sides[::-1], size)[:, :N]
    top_cut = signal.ellip(10, 0.1, 80, top_hz, fs=SR, output="sos")
    return signal.sosfilt(top_cut, low_cut(wide, rumble_hz))


dry = scene()
out = record(dry)
generate_wav(out)
```